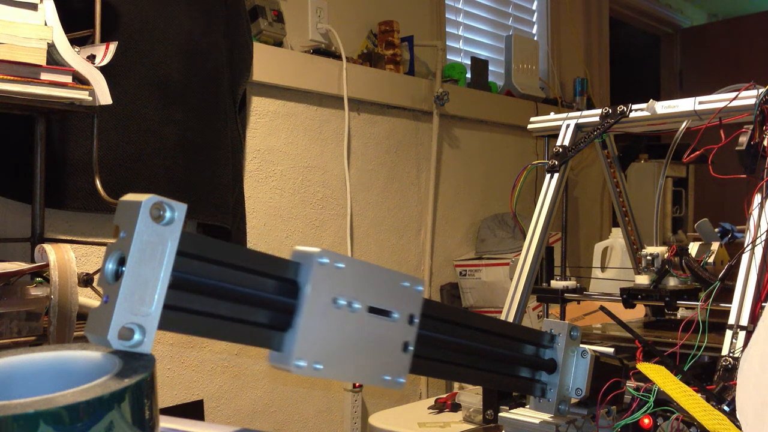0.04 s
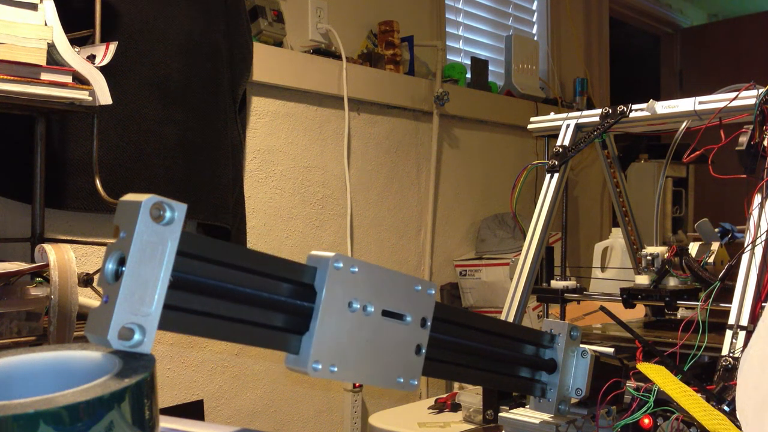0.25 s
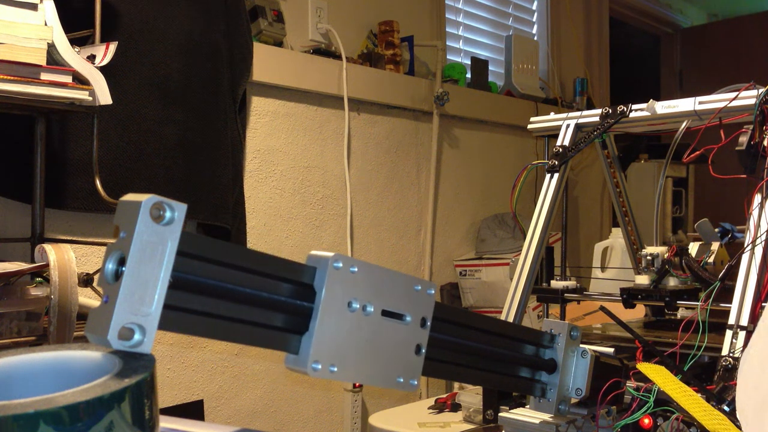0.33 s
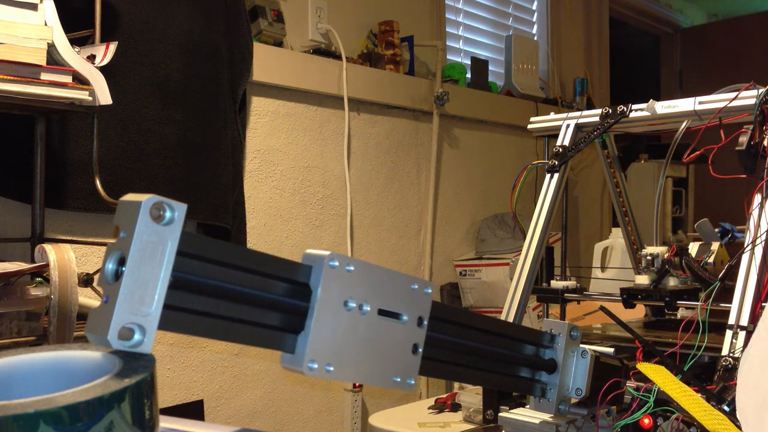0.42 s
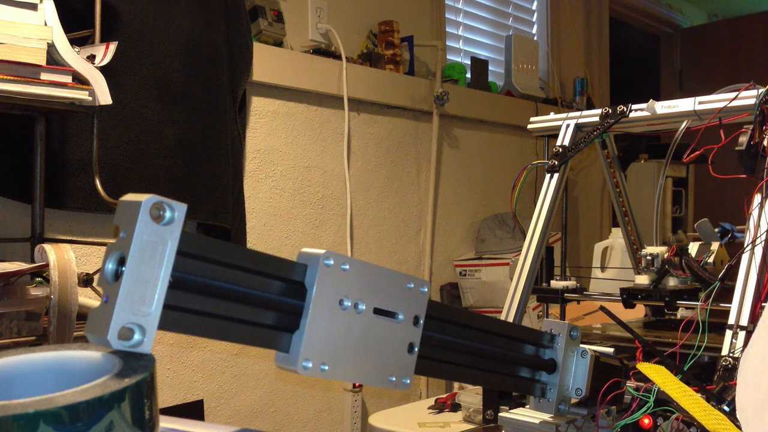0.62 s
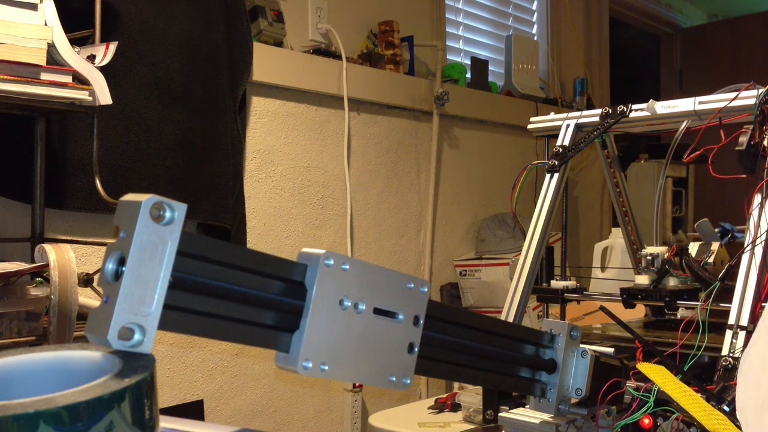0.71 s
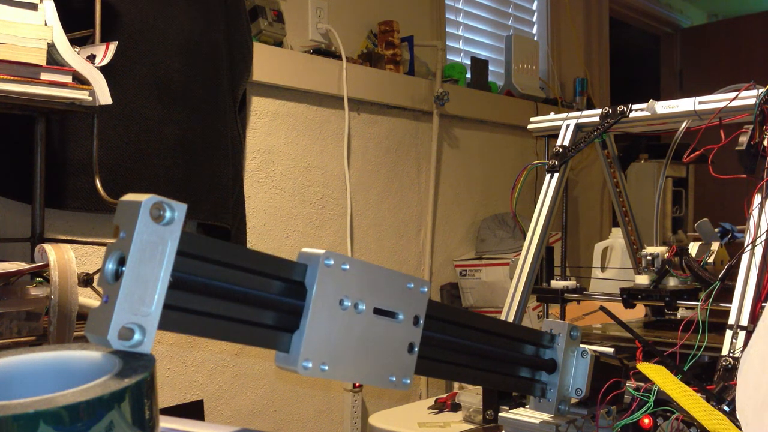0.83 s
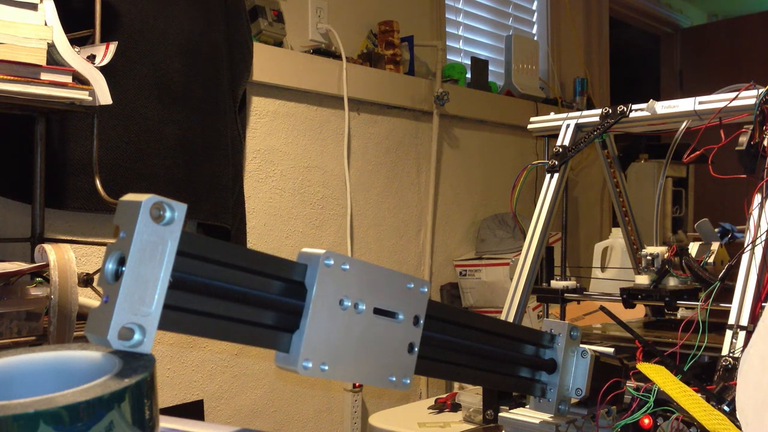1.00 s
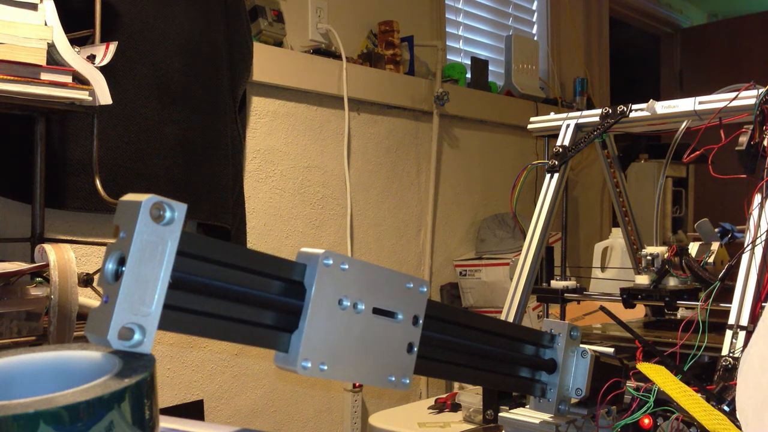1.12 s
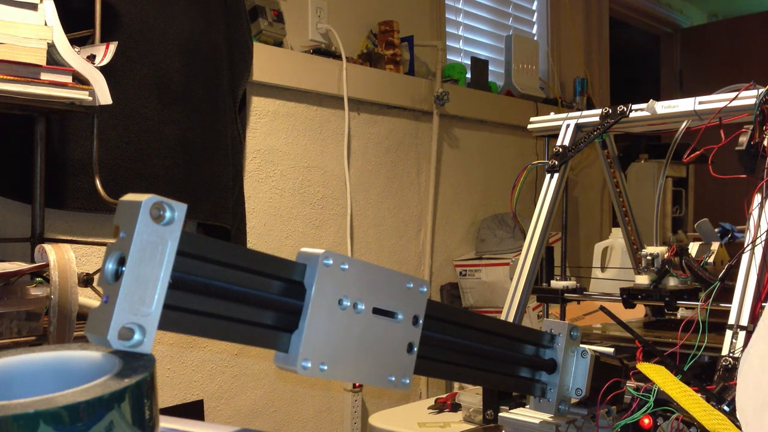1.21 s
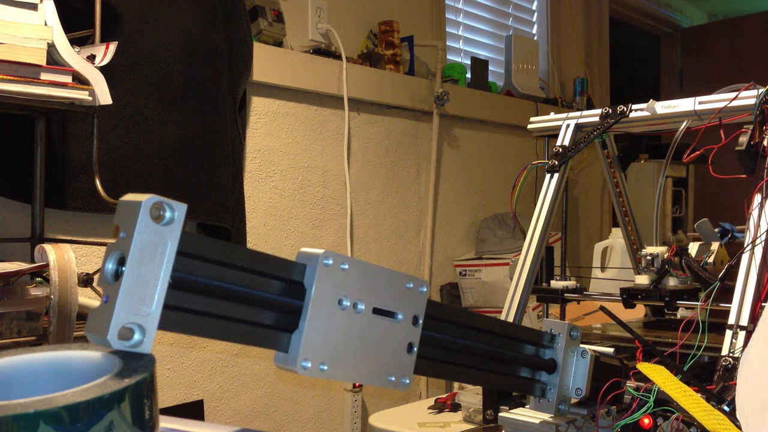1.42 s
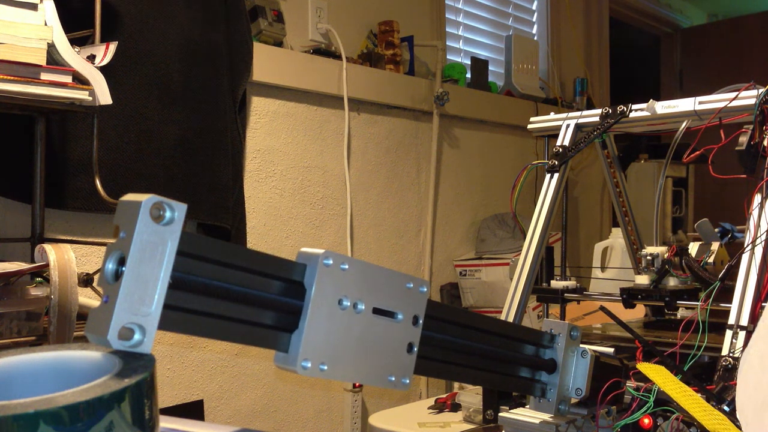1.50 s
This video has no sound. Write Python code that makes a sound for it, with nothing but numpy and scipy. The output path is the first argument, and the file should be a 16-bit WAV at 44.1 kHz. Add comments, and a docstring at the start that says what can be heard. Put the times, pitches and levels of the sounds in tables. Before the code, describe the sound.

A stepper motor whines, falling in pitch for the first 0.4 seconds over the light hiss of a sliding screw. From about 0.2 seconds the metal carriage shakes in short buzzing rattles and clicks. The whine rises briefly near 0.5 seconds and stops by 0.7. A very faint high whistle lingers until two soft clacks with a low ring at 1.1 seconds. Quiet electrical hum continues throughout.

```python
"""Small workshop: a stepper motor on a leadscrew slide slows to a crawl, speeds up briefly and stops.
Its whine follows the step rate over the hiss of the sliding screw; at some speeds the steps shake
the loose carriage into buzzing rattles. At rest the driver whistles faintly. A last nudge gives
two clacks and a low ring of the rail. Mains hum and room tone run throughout."""
import sys
import numpy as np
from scipy import signal
from scipy.fft import rfft, irfft
from scipy.io import wavfile
from scipy.ndimage import uniform_filter1d

SR = 44100
rng = np.random.default_rng(int(sys.argv[2]) if len(sys.argv) > 2 else 0)


def put_to_file(sound):
    """Save the sound as 16-bit audio at rate SR, in the file named by the first command-line argument."""
    columns = np.atleast_2d(sound).T  # one column per channel
    safe = np.clip(columns, -1, 1)
    whole_steps = np.round(safe * 32767)
    wavfile.write(sys.argv[1], SR, whole_steps.astype(np.int16))


N = 68355
FFT_SIZE = 81920
TIME_S = np.arange(N) / SR
FREQ_HZ = np.maximum(np.arange(FFT_SIZE // 2 + 1) * SR / FFT_SIZE, 1e-3)

# motor speed: time_s, step_rate_hz
STEP_RATE = [(0, 1400), (.09, 1065), (.14, 875.7), (.2, 661), (.24, 510.5), (.275, 397.1), (.31, 243),
             (.35, 164.8), (.39, 135.1), (.42, 141.4), (.452, 235.2), (.485, 373), (.525, 484.2),
             (.545, 395.4), (.565, 295.1), (.615, 168.3), (.665, 155.4)]
# step tone: time_s, level_db
WHINE_LEVEL = [(0, -53), (.025, -62.5), (.047, -47.5), (.065, -54), (.088, -44), (.112, -68), (.14, -47.5),
               (.165, -58), (.2, -46.5), (.236, -40), (.255, -46.5), (.28, -46.5), (.3, -68), (.35, -45),
               (.378, -48.5), (.39, -90), (.44, -54), (.452, -39), (.465, -55.5), (.485, -45), (.51, -88),
               (.545, -46), (.565, -55.5), (.62, -56.5), (.66, -51), (.672, -78)]
# its overtones: step_multiple, relative_db
WHINE_OVERTONES = [(1.5, -25), (2, -17.5), (3, -17)]
# partials crossing a resonance: time_s, step_multiple, level_db, half_length_s
WHINE_SWELLS = [(0.093, .5, -46, 0.0051), (0.12, .5, -54.5, 0.022), (0.063, 2, -67, 0.0098),
                (0.156, 2, -52.5, 0.011), (0.205, 2.5, -51.5, 0.023), (0.2344, 2, -44, 0.0057),
                (0.2372, 3, -29, 0.0079), (0.2435, 4, -29.5, 0.0055), (0.2391, 6, -33.5, 0.0075),
                (0.2371, 7, -31.5, 0.0034), (0.2407, 10, -53, 0.0055), (0.316, 3, -45.5, 0.0079),
                (.585, 7, -47.5, 0.0055)]
# screw friction: time_s, level_db
SCREW_LEVEL = [(0, -52), (.12, -54), (.2, -52), (.33, -42), (.38, -52.5), (.47, -43), (.56, -53.5),
               (.61, -44.5), (.69, -96)]
# screw friction spectrum: freq_hz, relative_db
SCREW_SPECTRUM = [(70, -68), (160, 6), (350, -1.5), (700, -4), (950, -9), (1650, -4), (2050, -1.5),
                  (2600, -9.5), (3300, -10.5), (4500, -21), (8000, -30.5), (15000, -48)]
# mains harmonics: pitch_hz, level_db
HUM_PARTIALS = [(119.8, -70), (241, -77), (360, -76.5), (480, -81)]
# hum drift: time_s, gain_db
HUM_GAIN = [(0, -1), (.9, -1), (1.4, 1)]
# room tone spectrum: freq_hz, relative_db
ROOM_TONE_SPECTRUM = [(25, -22.5), (75, -16.5), (105, -7), (190, -2.5), (300, -9), (450, -13), (850, -18.5),
                      (1400, -23.5), (2300, -20.5), (4600, -23), (5400, -21.5), (6300, -25), (10000, -26),
                      (15000, -28)]
# carriage rattles: peak_s, level_db, rise_s, fall_s, roughness (0-1), plate_hz, bass_db, treble_db
CARRIAGE_RATTLES = [(0.237, -31, 0.0057, 0.0088, 0.57, 2010, -7, -2),
                    (0.251, -34, 0.0034, 0.013, 0.44, 2190, 9, 17),
                    (.268, -30, 0.0045, 0.0055, 0.05, 1990, -33, -5),
                    (0.31, -24.5, 0.0043, 0.0086, 0.17, 1977, -5.5, 0),
                    (0.326, -32, 0.0028, 0.0063, 0.23, 2018, -6, -8.5),
                    (0.443, -33.5, 0.0036, 0.0093, 0.77, 1720, 3, 5),
                    (0.4534, -29, 0.0039, 0.0052, 0.35, 2067, 0.5, -10.5),
                    (.476, -48, 0.0061, 0.02, 0.5, 2090, -32, -2),
                    (.525, -34, 0.0036, 0.0048, 0.38, 1896, -2, -9),
                    (0.581, -41, 0.0099, 0.0068, 0.42, 1614, 15.5, 1),
                    (0.61, -51.5, 0.0051, 0.011, 0.3, 2014, 3, 3)]
# carriage and rail modes: pitch_hz, width_hz, gain_db
FRAME_MODES = [(238, 390, -12), (490, 660, -6.5), (757, 82, -11.5), (1140, 230, 2), (1485, 155, 7),
               (1695, 130, 1.5), (2257, 45, 4.5), (2370, 37, 4), (2570, 540, -15.5), (2993, 240, 4),
               (3470, 240, 4.5), (3647, 320, 3), (3930, 450, -8)]
# tone balance points of a contact: bass_hz, mid_hz, treble_hz, top_hz
BALANCE_POINTS = [700, 2090, 3400, 6000]
# nut and carriage knocks: start_s, level_db, chatter_decay_s, plate_hz, bass_db, treble_db
BACKLASH_KNOCKS = [(0.392, -38, 0.0027, 1475, 0, -1), (0.3927, -37, 0.0017, 2100, -4, -7.5),
                   (0.4296, -38.5, 0.003, 1750, 4, -15), (0.4338, -34.5, 0.0024, 2090, -1.5, -6),
                   (0.456, -29.5, 0.0021, 2105, 4, 0.5), (0.4629, -32, 0.0041, 2110, -23, -3),
                   (1.097, -48, 0.0088, 1650, 19.5, -11), (1.1, -48.5, 0.022, 2054, 17, -8),
                   (1.137, -48, 0.015, 2016, 13.5, -5.5)]
# low ring of the rail: peak_s, pitch_hz, level_db, rise_s, fall_s
RAIL_THUMPS = [(.617, 172, -39, .005, .0065), (1.12, 156, -44, .006, .011), (1.169, 165, -53, .007, .01)]
# ticks before the last nudge: start_s, level_db, centre_hz
FAINT_TICKS = [(1.0697, -60, 2220), (1.082, -61.5, 4260)]


def undb(db):
    """Decibels to gain."""
    return 10 ** (np.asarray(db) / 20)


def curve(rows):
    """Straight lines through (time_s, value) points."""
    return np.interp(TIME_S, *np.array(rows).T)


def unit_rms(x):
    """Scale to rms 1."""
    return x / np.sqrt(np.mean(x ** 2))


def filtered(x, response):
    """Apply a frequency response."""
    return irfft(rfft(x, FFT_SIZE) * response)[:N]


def resonance(hz, width_hz):
    """One damped mode, gain 1 at its centre."""
    return 1 / (1 + 1j * (FREQ_HZ ** 2 - hz ** 2) / (FREQ_HZ * width_hz))


def equaliser(hz, db):
    """Response through given points, on a log frequency axis."""
    return undb(np.interp(np.log(FREQ_HZ), np.log(hz), db))


def noise(spectrum):
    """Noise of rms 1 shaped by (freq_hz, relative_db) points."""
    return unit_rms(filtered(rng.standard_normal(N), equaliser(*np.array(spectrum).T)))


def swell(peak_s, rise_s, fall_s):
    """Bell-shaped envelope."""
    return np.exp(-.5 * ((TIME_S - peak_s) / np.where(TIME_S < peak_s, rise_s, fall_s)) ** 2)


def decay(start_s, decay_s):
    """Sudden start, exponential fall."""
    return (TIME_S >= start_s) * np.exp(-np.abs(TIME_S - start_s) / decay_s)


def at_level(x, db):
    """Set the rms of the loudest 8 ms."""
    return x * undb(db) / np.sqrt(uniform_filter1d(x * x, size=353).max())


def motor_whine(steps):
    """Wavering step tone and overtones; partials swell as they cross resonances."""
    def partial(multiple):
        return np.sqrt(2) * np.sin(2 * np.pi * multiple * steps)

    def waver(depth_db):
        return undb(depth_db * noise([(10, 28), (50, 42), (250, -65), (1000, -87)]))

    tone = partial(1) * waver(depth_db=0.2225)
    tone += sum(undb(db) * waver(depth_db=2.3) * partial(k) for k, db in WHINE_OVERTONES)
    swells = sum(undb(db) * swell(peak_s, half_s, half_s) * partial(k)
                 for peak_s, k, db, half_s in WHINE_SWELLS)
    return tone * undb(curve(WHINE_LEVEL)) + swells


def screw_friction():
    """The sliding screw hisses until the motor stops."""
    return undb(curve(SCREW_LEVEL)) * noise(SCREW_SPECTRUM)


def mains_hum():
    """Mains harmonics, slightly louder at the end."""
    hum = sum(undb(db) * np.sin(2 * np.pi * (hz * TIME_S + rng.random())) for hz, db in HUM_PARTIALS)
    return np.sqrt(2) * hum * undb(curve(HUM_GAIN))


def room_tone(level_db=-63):
    """Steady, low background noise."""
    return undb(level_db) * noise(ROOM_TONE_SPECTRUM)


def carriage_ring(force, plate_hz, bass_db, treble_db, contact_hz=4640):
    """A contact rings frame and plate with a thin crack; where it lands sets plate pitch and tone."""
    frame = sum(undb(db) * resonance(hz, width_hz) ** 2 for hz, width_hz, db in FRAME_MODES)
    plate = undb(17) * resonance(plate_hz, width_hz=95) * resonance(plate_hz, width_hz=1210)
    softness = 1 / np.sqrt(1 + (FREQ_HZ / contact_hz) ** 20)  # too soft to ring higher modes
    crack = undb(-25.5) * resonance(5650, width_hz=3700) ** 2
    balance = equaliser(BALANCE_POINTS, [bass_db, 0, treble_db, 0])
    return filtered(force, ((frame + plate) * softness + crack) * balance)


def carriage_rattles(steps, jitter_s=0.00033, scatter_db=4.5, scrape_db=5):
    """The loose carriage strikes once a step; roughness scales jitter, scatter and scraping."""
    step_times_s = np.interp(np.arange(1, int(steps[-1])), steps, TIME_S)
    out = 0
    for peak_s, db, rise_s, fall_s, roughness, plate_hz, bass_db, treble_db in CARRIAGE_RATTLES:
        lateness, strength = rng.standard_normal((1024, 2))[:len(step_times_s)].T
        position = np.clip((step_times_s + roughness * jitter_s * lateness) * SR, 0, N - 2)
        gain = undb(roughness * scatter_db * strength)
        sample, share = position.astype(int), position % 1  # each strike spans two samples
        strikes = np.bincount(sample, gain * (1 - share), N) + np.bincount(sample + 1, gain * share, N)
        scrape = unit_rms(rng.standard_normal(N) * np.exp(-(steps % 1) / 0.6))
        force = unit_rms(strikes) + roughness * undb(scrape_db) * scrape
        force *= swell(peak_s, rise_s, fall_s)
        out += at_level(carriage_ring(force, plate_hz, bass_db, treble_db), db)
    return out


def backlash_knocks(chatter_gain=0.17):
    """Backlash closes with one blow and a short chatter."""
    out = 0
    for start_s, db, decay_s, plate_hz, bass_db, treble_db in BACKLASH_KNOCKS:
        force = chatter_gain * rng.standard_normal(N) * decay(start_s, decay_s)
        force[int(start_s * SR)] += 1
        out += at_level(carriage_ring(force, plate_hz, bass_db, treble_db), db)
    return out


def rail_thumps():
    """The rail rings low for a few cycles as the rotor jerks."""
    out = 0
    for peak_s, hz, db, rise_s, fall_s in RAIL_THUMPS:
        tone = np.sqrt(2) * np.cos(2 * np.pi * hz * (TIME_S - peak_s))
        out += undb(db) * swell(peak_s, rise_s, fall_s) * tone
    return out


def driver_whistle(start_s=.64, end_s=1.105, fade_s=0.013, start_hz=11797, sag_hz_per_s=32, db=-72.5):
    """A thin, sagging whistle while the coils hold the rotor."""
    gate = np.clip(np.minimum(TIME_S - start_s, end_s - TIME_S) / fade_s + .5, 0, 1)
    pitch_hz = start_hz - sag_hz_per_s * (TIME_S - start_s)
    return np.sqrt(2) * undb(db) * gate * np.sin(2 * np.pi * np.cumsum(pitch_hz) / SR)


def faint_ticks(width_hz=2900, decay_s=0.0088):
    """Two short noise bursts just before the last nudge."""
    out = 0
    for start_s, db, hz in FAINT_TICKS:
        burst = rng.standard_normal(N) * decay(start_s, decay_s)
        out += at_level(filtered(burst, resonance(hz, width_hz) ** 2), db)
    return out


def workshop_reverb(x, t60_s=.2, delay_s=.004, wet_db=-14):
    """Add the short diffuse tail of a cluttered room."""
    tail = noise([(100, -14), (250, -8), (500, 0), (3000, 0), (12000, -6)])
    tail *= decay(delay_s, t60_s / np.log(1000))
    tail /= np.sqrt(np.sum(tail ** 2))
    return x + undb(wet_db) * filtered(x, rfft(tail, FFT_SIZE))


def scene():
    """The step count drives whine and rattles; all sources mix to mono."""
    steps = np.cumsum(curve(STEP_RATE)) / SR
    machine = motor_whine(steps) + screw_friction() + carriage_rattles(steps)
    machine += backlash_knocks() + rail_thumps() + faint_ticks()
    low_cut = 1 / np.sqrt(1 + (125 / FREQ_HZ) ** 12)  # a small machine radiates no deep bass
    machine = filtered(machine, low_cut)
    return (workshop_reverb(machine) + driver_whistle() + mains_hum() + room_tone())[None]


def record(dry):
    """Steep low-pass at 15450 Hz."""
    return signal.sosfilt(signal.ellip(12, .1, 70, 15450, fs=SR, output="sos"), dry)


dry = scene()
out = record(dry)
put_to_file(out)
```